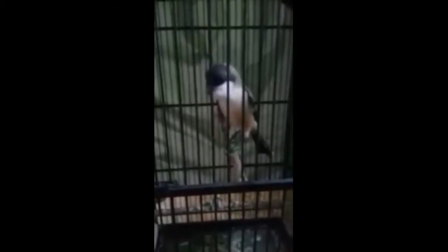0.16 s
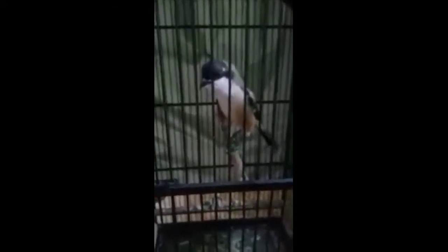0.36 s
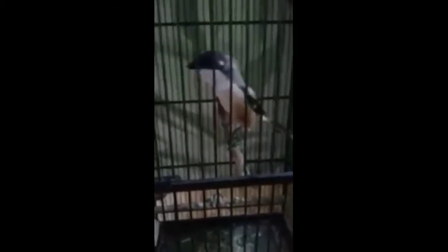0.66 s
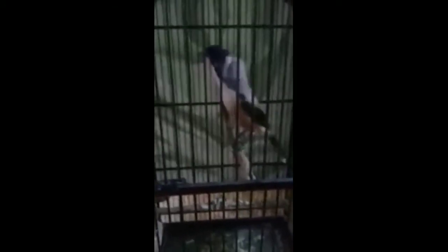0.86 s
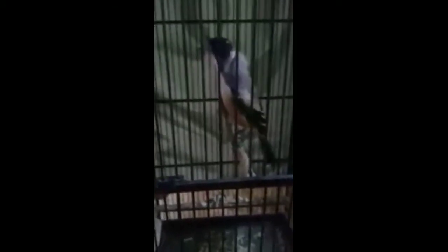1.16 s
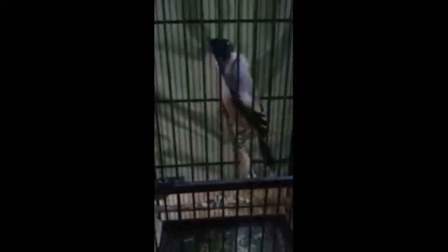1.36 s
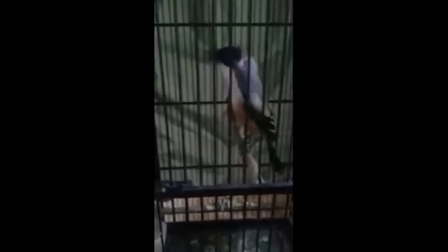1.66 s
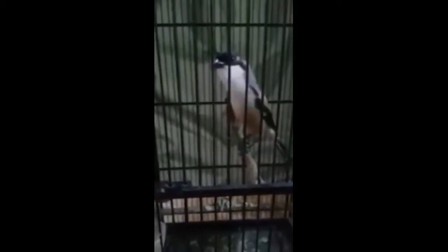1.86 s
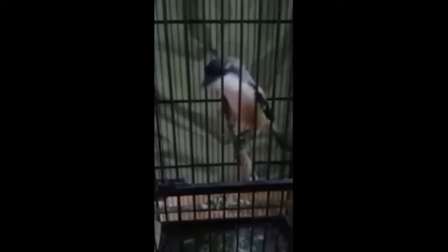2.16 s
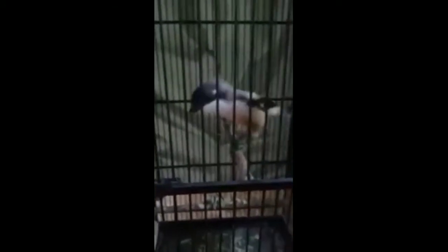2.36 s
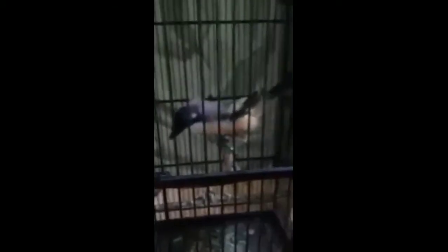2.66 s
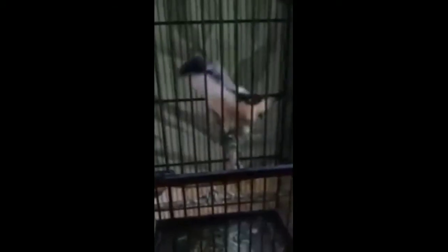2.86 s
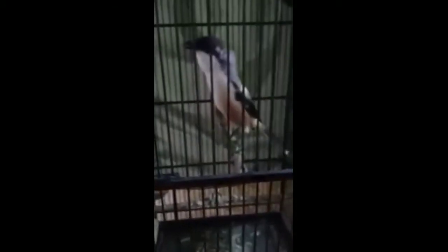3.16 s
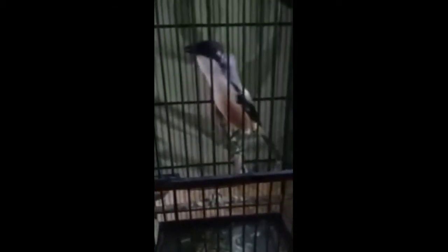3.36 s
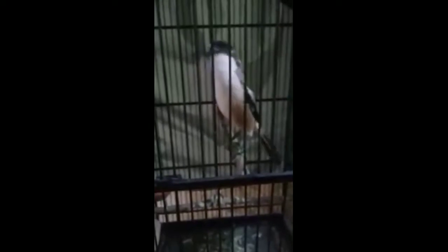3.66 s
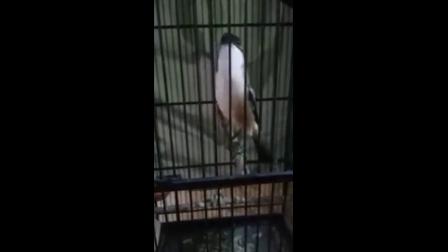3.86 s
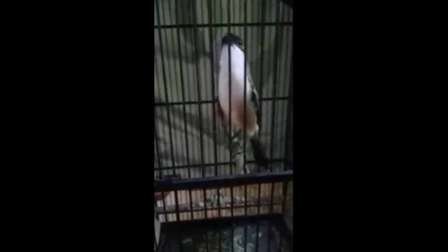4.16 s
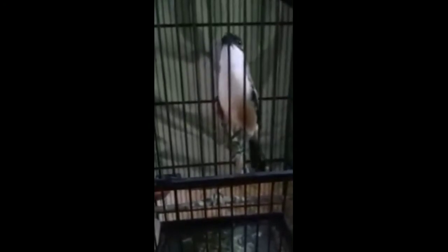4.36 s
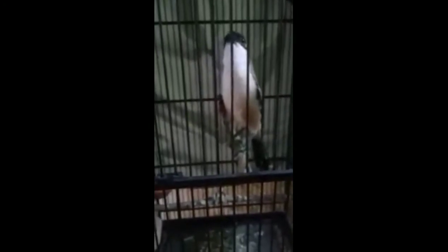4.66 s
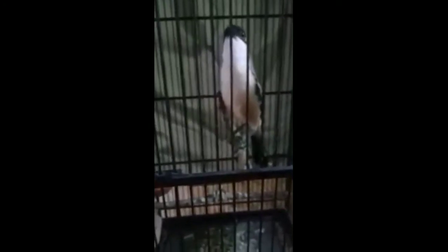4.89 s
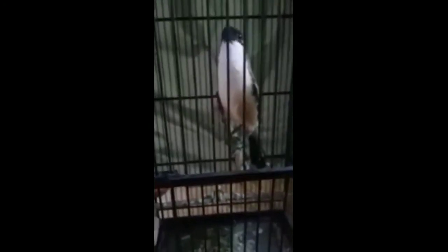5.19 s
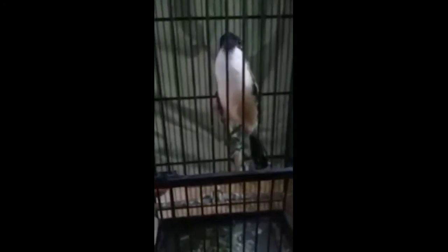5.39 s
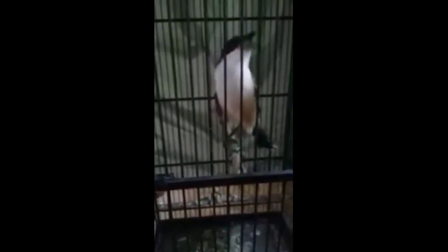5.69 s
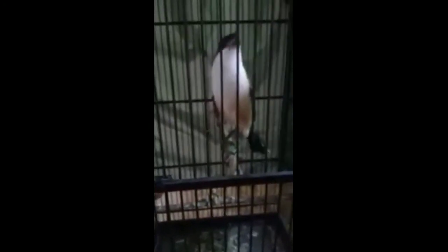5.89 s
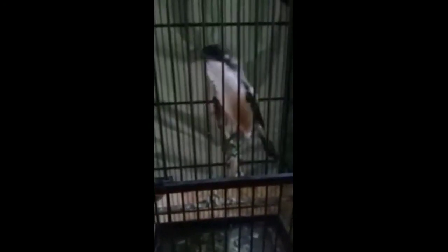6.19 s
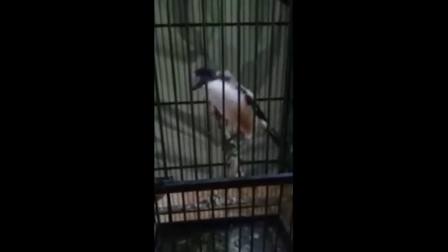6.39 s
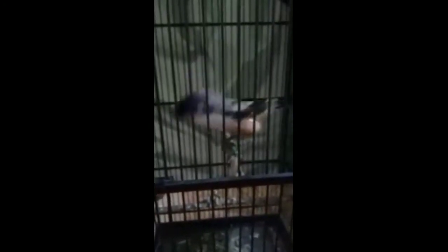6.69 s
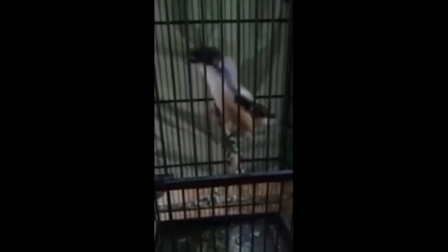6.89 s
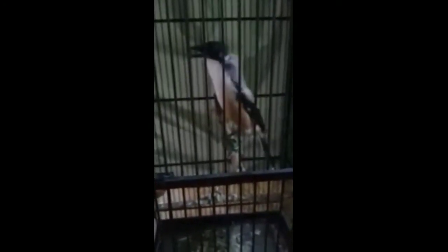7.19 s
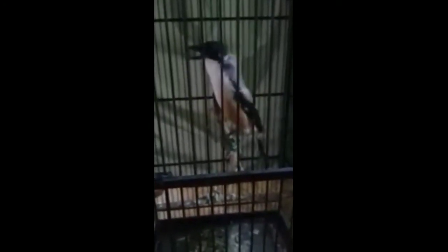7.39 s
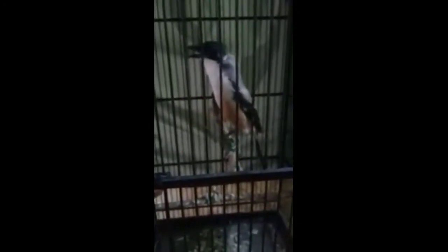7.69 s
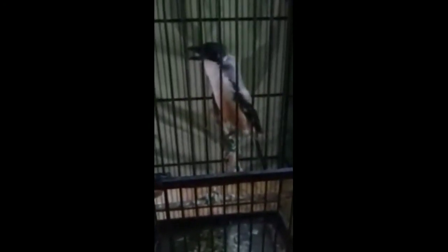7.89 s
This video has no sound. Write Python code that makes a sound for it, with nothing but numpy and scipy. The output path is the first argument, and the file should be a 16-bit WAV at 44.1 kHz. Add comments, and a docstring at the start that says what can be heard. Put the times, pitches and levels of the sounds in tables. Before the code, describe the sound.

A caged shrike gives a few slurred calls, then chatters in a fast, unbroken trill of nasal chips that turns into harsh, squeaky rasps.

```python
"""Caged shrike chattering

A shrike chatters in a wire cage in a small room, about thirteen notes a second in the trill.
A few slurred calls lead into arched chips rich in overtones; then the bill opens wide and each note
becomes a rising squeak that breaks into a rasp. Each note is a stack of harmonics plus hiss, shaped by
the bill. Cage resonances and room echoes answer it; the bird shuffles twice over a faint low rumble.
"""
import sys
import numpy as np
from scipy import signal
from scipy.fft import rfft, irfft
from scipy.io import wavfile
from scipy.ndimage import uniform_filter1d, minimum_filter1d

SR = 44100
rng = np.random.default_rng(int(sys.argv[2]) if len(sys.argv) > 2 else 0)


def materialize(psi):
    """Save the field psi as 16-bit PCM at rate SR to the path in sys.argv[1].

    A 1-D psi becomes a single channel; in a 2-D psi each row is a channel.
    """
    bounded = np.clip(np.atleast_2d(psi).T, -1, 1)
    quanta = np.round(bounded * 32767).astype(np.int16)
    wavfile.write(sys.argv[1], SR, quanta)


N = 354563
TIME = np.arange(N) / SR


def from_db(db):
    """Turn decibels into gain."""
    return 10 ** (np.asarray(db) / 20)


def rms_one(x):
    """Scale a sound to an rms of 1."""
    return x / np.sqrt(np.mean(x ** 2) + 1e-20)


def read(rows, at):
    """Read each column of a table, joining its points by straight lines."""
    key, *columns = np.transpose(rows)
    return [np.interp(at, key, column) for column in columns]


def add(out, s, sound):
    """Mix a sound in from a given time in seconds."""
    start = max(0, round(s * SR))
    out[start:start + len(sound)] += sound[:max(0, N - start)]


def response(points, size=1024):
    """Make a filter with a given spectrum that never answers before its input (minimum phase)."""
    hz, db = np.transpose(points)
    grid = np.maximum(np.fft.rfftfreq(size, 1 / SR), 1)
    curve_db = np.interp(np.log(grid), np.log(hz), db)
    cepstrum = irfft(np.log(from_db(curve_db)))
    # folding the second half onto the first removes any answer ahead of time
    cepstrum[1:size // 2] *= 2
    cepstrum[size // 2 + 1:] = 0
    return irfft(np.exp(rfft(cepstrum)))


def through(x, impulse):
    """Pass a sound through an impulse response, keeping its length."""
    return signal.fftconvolve(x, impulse)[:len(x)]


def wobble(t, hz):
    """Random motion, mostly slower than a given rate, with a spread of about 1."""
    lowpass = signal.butter(2, min(hz, SR / 3), fs=SR, output="sos")
    motion = signal.sosfilt(lowpass, rng.standard_normal(2 * len(t)))
    # the first half is dropped while the filter settles
    return rms_one(motion)[len(t):]


def note(course, length, slack_hz, top_hz, bill, upper_db, treble_db, flutter, flutter_hz, hoarse,
         jitter_hz, hiss_db, fundamental_db, waver_db=1.6569, chaos_hz=750, shimmer=0.618,
         waver_hz=11, lean=0.1458):
    """One pulse of the syrinx (the bird's voice box): tension lifts the pitch, the bill shapes the tone.

    Returns the start relative to the onset [s], and the sound scaled to rms 1 over its basic length.
    """
    start, end = round(course[0][0] * length * SR), round(course[-1][0] * length * SR)
    t = np.arange(start, end) / SR
    # each note leans a little to the front or the back
    bend = np.sin(np.pi * t / length) / np.pi
    progress = t / length + lean * rng.standard_normal() * bend
    tension, pressure_db, rough, third_db = read(course, progress)
    rough = rough + hoarse

    # rough membranes swing irregularly
    pitch = slack_hz + (top_hz - slack_hz) * tension
    pitch = pitch + waver_hz * wobble(t, 160)
    pitch = pitch + jitter_hz * rough * wobble(t, chaos_hz)
    phase = 2 * np.pi * np.cumsum(pitch) / SR

    # the throat swells now the second harmonic, now the third
    k = np.arange(1, 10)[:, None]  # harmonic numbers
    third_gain_db = upper_db + third_db + waver_db * wobble(t, 100)
    harmonic_db = third_gain_db * (k == 3) + treble_db * (k > 3) + fundamental_db * (k == 1)
    voice = np.sum(from_db(harmonic_db) * np.sin(k * phase), axis=0)
    voice = voice * (1 + shimmer * rough * wobble(t, chaos_hz))

    # rougher moments carry more hiss
    hiss = signal.lfilter([1, -1], [1, -.6], rng.standard_normal(len(t)))
    voice = voice + from_db(hiss_db + treble_db) * rough * hiss
    voice = voice * from_db(pressure_db + waver_db * wobble(t, 100))

    # taut membranes flutter, chopping the note into grains
    flutter_cycles = flutter_hz * t + rng.random()
    voice = voice * (1 + flutter * tension * np.sin(2 * np.pi * flutter_cycles))
    sound = signal.fftconvolve(voice, bill)
    return t[0], sound / np.sqrt(np.sum(sound ** 2) / (length * SR))


def beats(pace, period_s=.076):
    """Onsets of a trill: evenly spaced notes, about one period apart, between changes of pace."""
    runs = []
    for start, end in zip(pace, pace[1:]):
        count = round((end - start) / period_s)
        runs.append(np.linspace(start, end, count, endpoint=False))
    return np.concatenate(runs + [pace[-1:]])


# chance differences between one trill note and the next: pitch [Hz], third harmonic [dB]
NOTE_SCATTER_HZ, NOTE_SCATTER_DB = 12.27, 0.9942
# course of one chip: (share of basic length [1], tension [0-1, below 0 is slacker], pressure [dB],
# roughness [1], third harmonic [dB])
CHIP_COURSE = [(-.2, -.3, -34, 0.59, -4), (-.03, 0, -3.5, 0.77, -11), (.1, 0.36, -2, 0.37, 1),
               (.21, .87, 4.5, 0.061, 5.5), (.36, 0.93, -1, 0.033, 11.5), (.62, 0.94, -1.5, 0.091, 12),
               (.74, 0.71, -7.5, 0.14, 10), (.87, 0.41, 1.5, 0.133, -4.5), (1.02, 0.48, -10, 0.22, -14),
               (1.16, 0.03, -24, 0.393, -13.5)]
# throat and bill half closed, for chips and slurs: (frequency [Hz], level [dB])
HALF_OPEN_BILL = [(800, -35.5), (1150, -18), (1420, -20), (1720, -23), (2050, -9), (2500, -0.5),
                  (2880, 0.5), (3350, -1.5), (3900, -4), (4650, -6), (5500, -23.5), (6600, -26.5),
                  (9000, -48), (14000, -60)]
# notes of the chip trill at which its pace shifts a little: (time [s])
CHIP_PACE = [0.746, .826, 1.346, 2.623, 3.156, 3.702, 4.309, 4.393, 5.162, 5.327]
# voice of the chips; where it slackens, pitch and third harmonic sink together:
# (time [s], full-tension pitch before scatter [Hz], relative level [dB],
# third harmonic offset before scatter [dB])
CHIP_VOICE = [(.75, 1678, -13, -11.5), (1.03, 1702, -12.5, -1.5), (1.68, 1660, -14, -5.5),
              (2.05, 1685, -10, -4), (2.25, 1674, -11, -4.5), (2.33, 1632, -12.5, -14.5),
              (2.53, 1669, -9.5, 0), (2.7, 1652, -9.5, -2), (2.87, 1525, -10, -12.5), (3.12, 1666, -10, -3),
              (3.36, 1538, -10.5, -5), (3.66, 1591, -9.5, -3.5), (4.39, 1559, -9, -4.5),
              (4.48, 1465, -11.5, -14.5), (4.62, 1485, -10.5, -12.5), (4.88, 1581, -9.5, -1.5),
              (5.24, 1534, -10, -5), (5.33, 1467, -10.5, -12.5)]
# harmonics above the third in the chips: (time [s], level [dB])
CHIP_TREBLE = [(.75, -7.5), (1.1, -1), (2.3, -1.5), (3.75, -1), (4.58, 3), (5.33, 0)]


def chips(gain_db=-3.5, first_slack_hz=1290, slack_sag_hz_per_s=15):
    """Clear notes: the syrinx tightens and slackens, so the pitch arches up and down."""
    out, bill = np.zeros(N), response(HALF_OPEN_BILL)
    for s in beats(CHIP_PACE):
        top_hz, level_db, upper_db = read(CHIP_VOICE, s)
        treble_db, = read(CHIP_TREBLE, s)
        top_hz = top_hz + NOTE_SCATTER_HZ * rng.standard_normal()
        upper_db = upper_db + NOTE_SCATTER_DB * rng.standard_normal()
        # the foot of the arch sinks as the trill goes on
        slack_hz = first_slack_hz - slack_sag_hz_per_s * (s - CHIP_PACE[0])
        lead, sound = note(CHIP_COURSE, .03, slack_hz, top_hz, bill, upper_db, treble_db,
                           flutter=0.11, flutter_hz=217, hoarse=0, jitter_hz=206.7,
                           hiss_db=8.5, fundamental_db=-1.0)
        add(out, s + lead, from_db(level_db + gain_db) * sound)
    return out


# course of one rasp: (share of basic length [1], tension [0-1], pressure [dB], roughness [1],
# third harmonic [dB])
RASP_COURSE = [(-.02, 0.057, -14, 0.48, -16), (.03, 0.2085, -1.5, 0.6, 0), (.15, 0.2993, -3.5, 0.093, 12.5),
               (.28, 0.591, 1, 0.364, 4.5), (.4, 0.8446, 1, 0.423, 3.5), (.7, 1, 0, .8, 0.5),
               (1, 0.779, -5.5, 1, -0.5), (1.22, 0.398, -13, 0.82, 4)]
# throat and bill wide open: (frequency [Hz], level [dB])
WIDE_OPEN_BILL = [(900, -44.5), (1350, -23.5), (1850, -23), (2300, -23.5), (2850, -10.5), (3400, -8.5),
                  (3800, -5), (4100, -3.5), (4550, 4), (5500, -3.5), (6800, -12), (9500, -22.5),
                  (11000, -33.5), (15500, -45)]
# notes of the rasp trill at which its pace shifts a little: (time [s])
RASP_PACE = [5.401, 5.988, 6.213, 7.05, 7.599, 7.984]
# the rasps flare up as the bill opens, then sink, draw out and coarsen:
# (time [s], full-tension pitch before scatter [Hz], relative level [dB], basic length [s],
# third harmonic offset before scatter [dB], higher harmonics [dB], pitch jitter at roughness 1 [Hz])
RASP_VOICE = [(5.4, 1953, -10.5, 0.0239, -14.5, -21, 45.7), (5.58, 2002, -8, 0.02176, -1, -1, 80.5),
              (5.9, 1936, -10, 0.02415, -2, 0.5, 140), (6.25, 1890, -10, 0.02726, -3, 1.5, 227.3),
              (7.2, 1761, -13.5, .029, -5.5, -5.5, 220), (7.6, 1786, -11, 0.03006, -3.5, -4.5, 209.6),
              (8.0, 1781, -11.5, 0.0291, -6, -7, 208.5)]


def rasps(gain_db=-2.5, slack_share=.7):
    """Rising squeaks: the membranes swing more and more irregularly as the tension peaks."""
    out, bill = np.zeros(N), response(WIDE_OPEN_BILL)
    for s in beats(RASP_PACE):
        top_hz, level_db, length, upper_db, treble_db, jitter_hz = read(RASP_VOICE, s)
        top_hz = top_hz + NOTE_SCATTER_HZ * rng.standard_normal()
        upper_db = upper_db + NOTE_SCATTER_DB * rng.standard_normal()
        lead, sound = note(RASP_COURSE, length, slack_share * top_hz, top_hz, bill, upper_db, treble_db,
                           flutter=0.155, flutter_hz=rng.uniform(217.4, 502.0), hoarse=0,
                           jitter_hz=jitter_hz, hiss_db=-4.0, fundamental_db=-1.5)
        add(out, s + lead, from_db(level_db + gain_db) * sound)
    return out


# course of one slurred call: (share of basic length [1], tension [0-1, below 0 is slacker],
# pressure [dB], roughness [1], third harmonic [dB])
SLUR_COURSE = [(-.15, -.2, -28.5, 0.66, -1.5), (.03, 0.2, -9.5, 0.505, 6.5), (.22, 0.93, -1.5, 0.02, 12),
               (.55, 0.94, -3, .02, 16), (.95, 0.6, -8, 0.044, 12), (1.2, 0.2, -22, 0.12, 6)]
# the opening calls: (time [s], basic length [s], full-tension pitch [Hz], relative level [dB],
# third harmonic offset [dB], flutter depth [0-1], added roughness [1])
SLURS = [(0.242, 0.0373, 1701, -13, -14.5, 0.3, 0.09), (0.295, 0.039, 1479, -13, -33, 0, 0.044),
         (.355, 0.033, 1520, -15.5, -28, 0.4, 0.18), (0.414, 0.0303, 1466, -14, -33.5, 0.08, 0.089),
         (0.606, .032, 1750, -12.5, -16, 0.7, 0.13), (0.67, 0.0368, 1667, -13.5, -23, 0.5, 0.243)]


def slurs(slack_hz=1252.7):
    """Opening calls, pure or hoarse: the bill passes mostly the second harmonic."""
    out, bill = np.zeros(N), response(HALF_OPEN_BILL)
    for s, length, top_hz, level_db, upper_db, flutter, hoarse in SLURS:
        treble_db = .5 * upper_db
        lead, sound = note(SLUR_COURSE, length, slack_hz, top_hz, bill, upper_db, treble_db,
                           flutter=flutter, flutter_hz=203.8, hoarse=hoarse, jitter_hz=160,
                           hiss_db=-3.5, fundamental_db=-7.5)
        add(out, s + lead, from_db(level_db) * sound)
    return out


# soft shuffles on the perch: (time [s], level at the swell's top [dB])
SHUFFLES = [(1.52, -48), (6.951, -52.5)]
# dull tone of feathers and feet: (frequency [Hz], level [dB])
SHUFFLE_TONE = [(100, -31), (350, -12.5), (700, -10.5), (6000, -59.5)]


def shuffles(rise_s=0.0181):
    """Feathers and feet rub: dull noise that swells quickly and dies away."""
    out, t = np.zeros(N), TIME[:SR // 3]
    swell = t / rise_s * np.exp(1 - t / rise_s)
    for s, level_db in SHUFFLES:
        noise = rng.standard_normal(len(t))
        rustle = rms_one(through(noise, response(SHUFFLE_TONE)))
        add(out, s, from_db(level_db) * rustle * swell)
    return out


# narrow resonances of the cage and its corner: (frequency [Hz], level [dB], time to fall 60 dB [s])
RESONANCES = [(1395.7, 3, 0.033), (1764, -3.5, 0.036), (2881, -9.5, 0.044), (4032, -3.5, 0.018),
              (4460, -17, 0.19), (5540, -14.5, 0.11), (6228, -6, 0.05)]


def cage(x):
    """Sounds that cross a resonance leave it ringing as a thin tone."""
    out = x
    for hz, db, t60 in RESONANCES:
        radius = from_db(-60 / (t60 * SR))  # ring left after one sample
        angle = 2 * np.pi * hz / SR
        feed = np.array([1, 0, -1]) * (1 - radius * radius) / 2
        feedback = [1, -2 * radius * np.cos(angle), radius * radius]
        out = out + from_db(db) * signal.lfilter(feed, feedback, x)
    return out


# echoes from nearby surfaces: (delay [s], level [dB])
ECHOES = [(.0031, -17), (.0085, -18)]
# colour of the room's ring: (frequency [Hz], level [dB])
ROOM_TONE = [(500, -5.5), (1500, 4.5), (3000, -1.5), (5000, -4), (8000, 3.5), (15000, -2)]


def room(x, t60=0.383, wet_db=-7.0, early_t60=0.074, early_db=-17.5, build_s=0.00067):
    """Walls return a few close echoes, a quick scatter from the nearest, then a longer ring."""
    t = TIME[:SR]
    # each t60 is the time to fall 60 dB [s]
    late = from_db(wet_db - 60 * t / t60) / np.sqrt(t60)
    early = from_db(early_db - 60 * t / early_t60) / np.sqrt(early_t60)
    build = 1 - np.exp(-t / build_s)
    tail = rng.standard_normal(len(t)) * (late + early) * build * np.sqrt(np.log(1000) / SR)
    impulse = through(tail, response(ROOM_TONE))
    for delay, db in ECHOES:
        impulse[round(delay * SR)] += from_db(db)
    return x + through(x, impulse)


def lingering(level_db=-35.5, pitch_hz=1460, width_hz=130, fall_db_per_s=135):
    """At the start the room still rings with an earlier note: fading, wavering harmonics."""
    t = TIME[:SR // 2]
    ring = np.zeros(len(t))
    for k, db in [(1, -11), (2, 0), (3, -22)]:  # (harmonic number, level [dB])
        ring = ring + from_db(db) * wobble(t, width_hz) * np.sin(2 * np.pi * k * pitch_hz * t)
    fade = from_db(level_db - fall_db_per_s * t)
    return np.pad(rms_one(ring) * fade, (0, N - len(t)))


# spectrum of the rumble: (frequency [Hz], relative level per Hz [dB])
BACKGROUND = [(20, -10.5), (55, -6.5), (120, -4.5), (180, -9), (220, 0), (280, -8.5), (380, -4.5),
              (600, -12), (3000, -17), (15000, -51.5)]
# loudness of the rumble: (time [s], level [dB])
BACKGROUND_LEVEL = [(0.0, -62.5), (5.19, -55), (5.96, -66.5), (8.04, -61.5)]


def background():
    """Faint low rumble of the surroundings: filtered noise with a drifting level."""
    level_db, = read(BACKGROUND_LEVEL, TIME)
    rumble = through(rng.standard_normal(N), response(BACKGROUND, size=8192))
    return from_db(level_db) * rms_one(rumble)


def scene():
    """The bird in its cage and room, with the background beneath."""
    bird = slurs() + chips() + rasps() + shuffles()
    return (room(cage(bird)) + lingering() + background())[None]


def limiter(x, ceiling_db=-1.0, share=0.91, release_db_per_s=900):
    """Peaks over the ceiling turn the gain down for a moment, by a share of their excess."""
    over_db = np.maximum(20 * np.log10(np.abs(x) + 1e-9) - ceiling_db, 0)
    # after a peak the hold lets go at a steady rate
    release_db = release_db_per_s * TIME
    held_db = np.maximum.accumulate(over_db + release_db, axis=-1) - release_db
    # widths in samples; the gain starts to fall just ahead of a peak
    gain_db = uniform_filter1d(minimum_filter1d(-held_db, size=65), size=65)
    return x * from_db(share * gain_db)


def record(dry, dip_hz=8350, dip_width_hz=1700, dip_db=-25.0, cutoff_hz=15700):
    """The microphone has a deep dip in the treble; peaks are held back and the top is cut."""
    notched = dry
    for width_hz in (dip_width_hz, dip_width_hz / 2):
        notch = signal.iirnotch(dip_hz, dip_hz / width_hz, fs=SR)
        notched = signal.lfilter(*notch, notched)
    # a little of what the notches removed remains
    limited = limiter(notched + from_db(dip_db) * (dry - notched))
    top_cut = signal.ellip(10, .2, 80, cutoff_hz, fs=SR, output="sos")
    return signal.sosfilt(top_cut, limited)


dry = scene()
out = record(dry)
materialize(out)
```